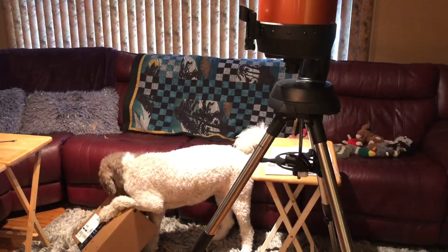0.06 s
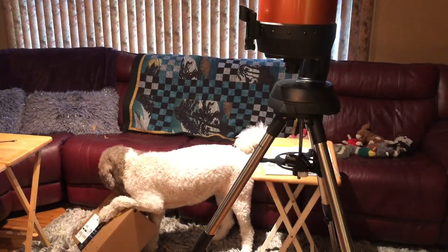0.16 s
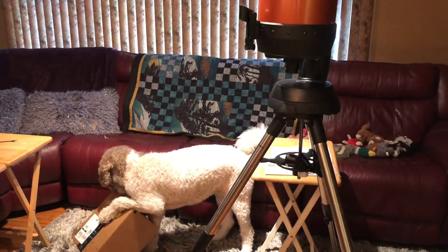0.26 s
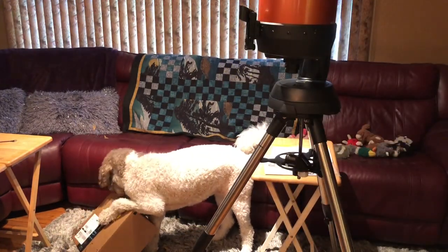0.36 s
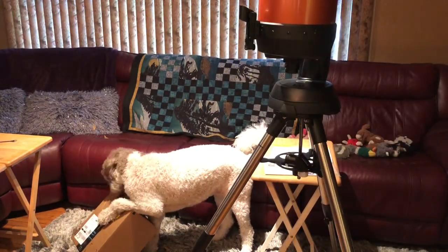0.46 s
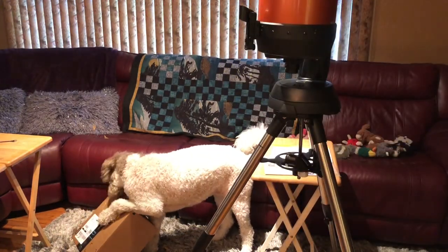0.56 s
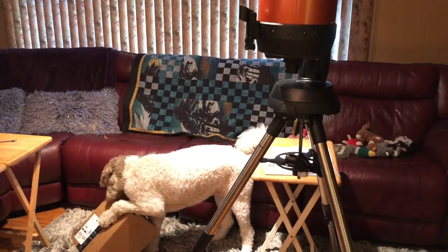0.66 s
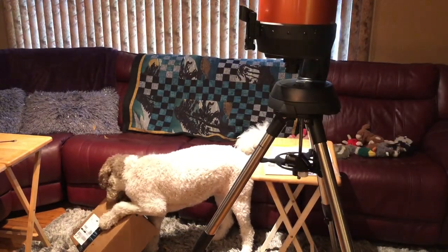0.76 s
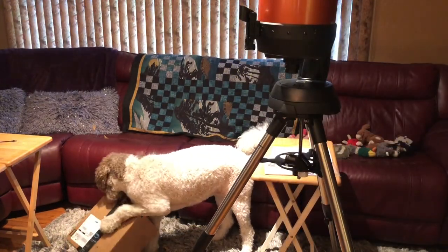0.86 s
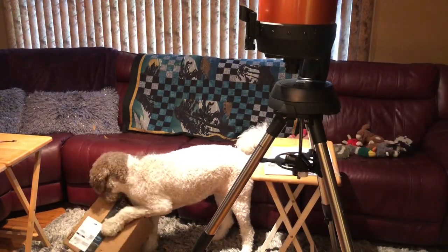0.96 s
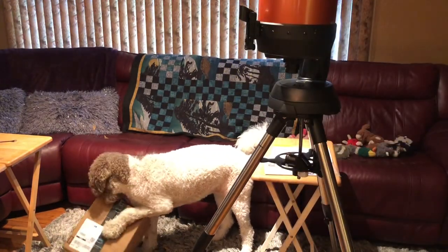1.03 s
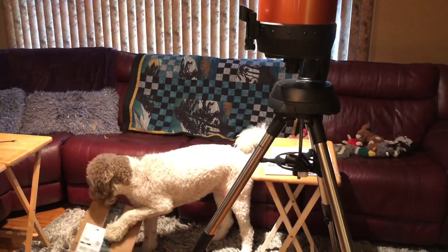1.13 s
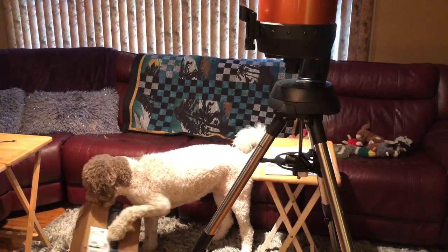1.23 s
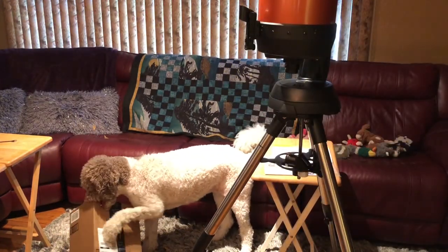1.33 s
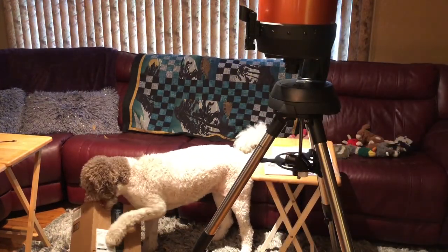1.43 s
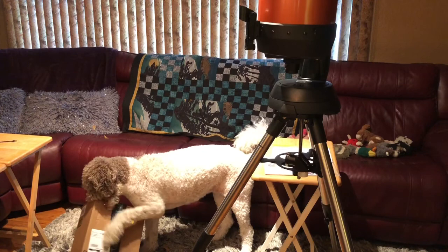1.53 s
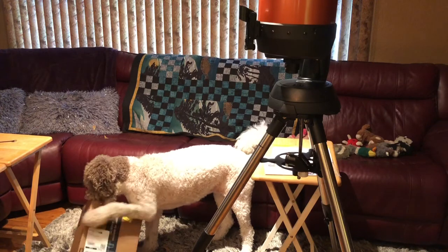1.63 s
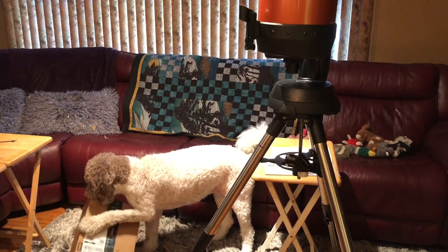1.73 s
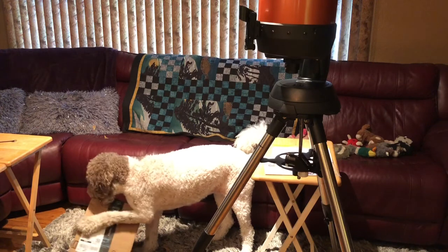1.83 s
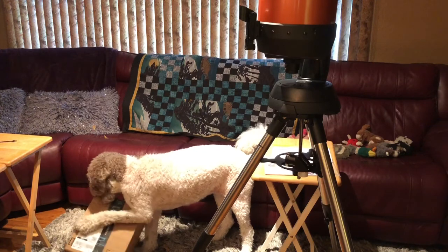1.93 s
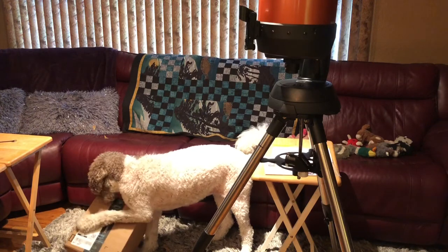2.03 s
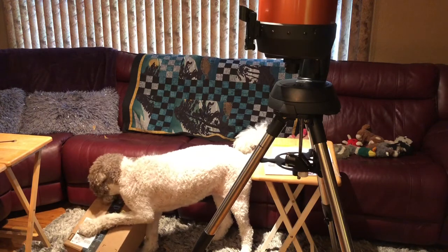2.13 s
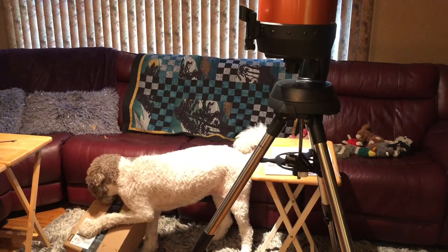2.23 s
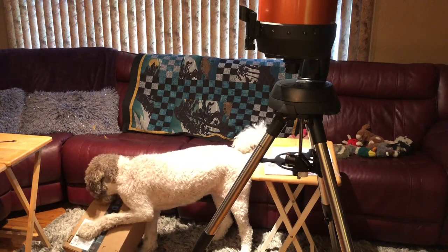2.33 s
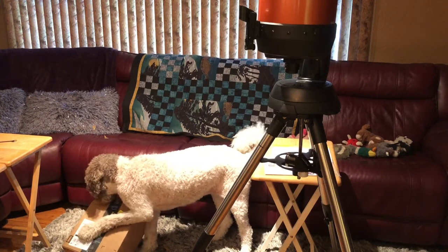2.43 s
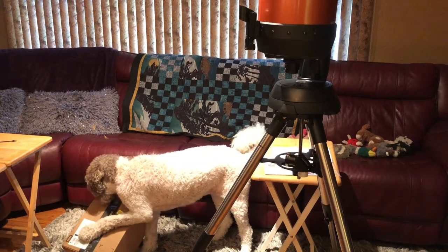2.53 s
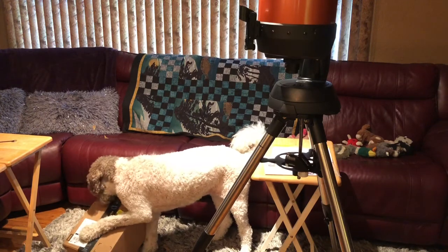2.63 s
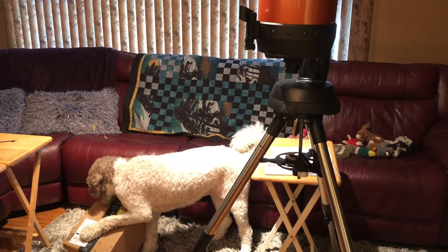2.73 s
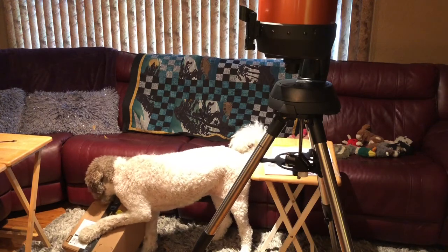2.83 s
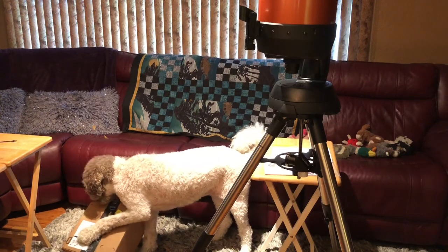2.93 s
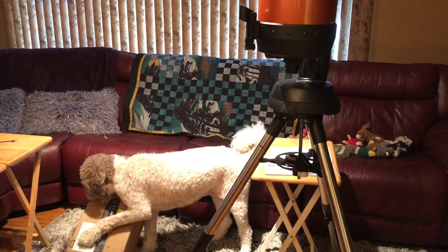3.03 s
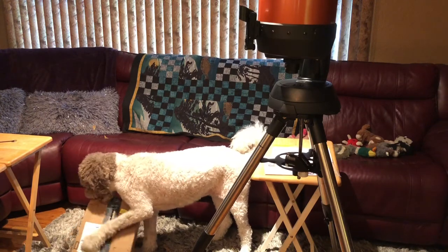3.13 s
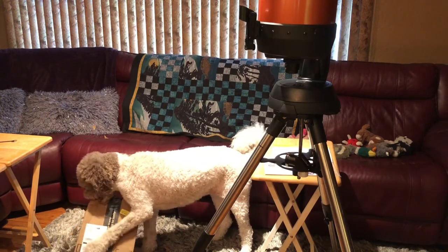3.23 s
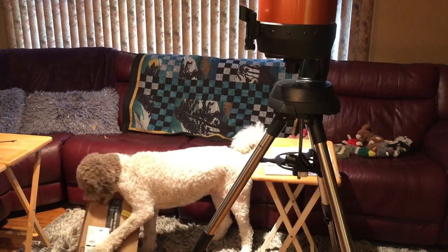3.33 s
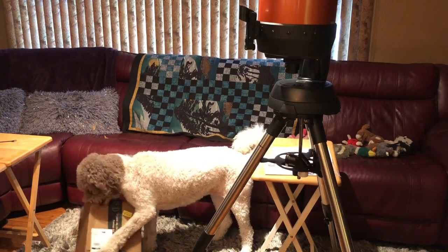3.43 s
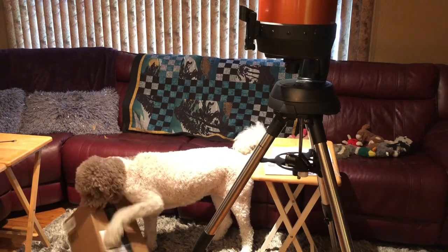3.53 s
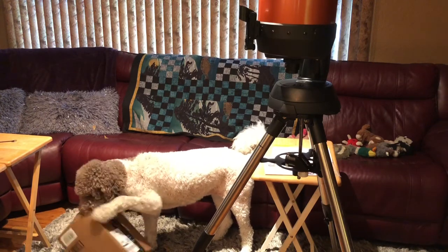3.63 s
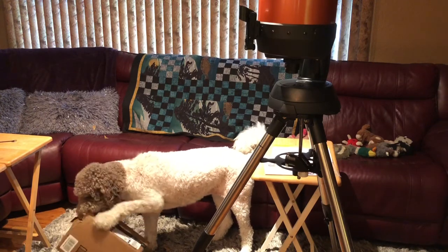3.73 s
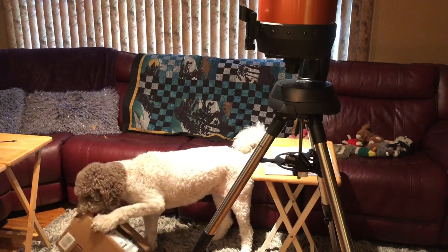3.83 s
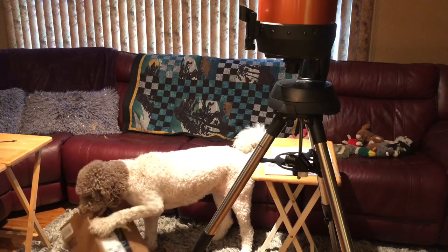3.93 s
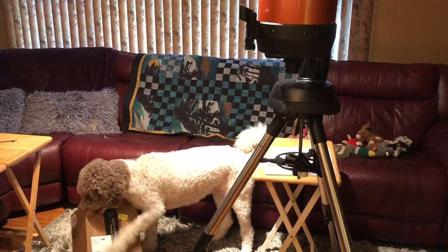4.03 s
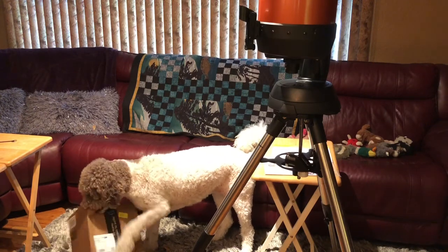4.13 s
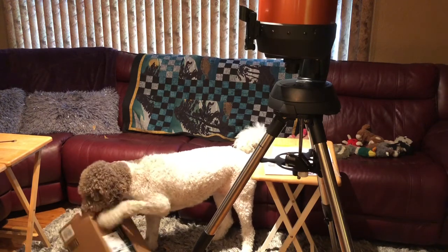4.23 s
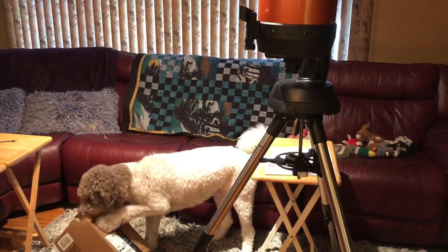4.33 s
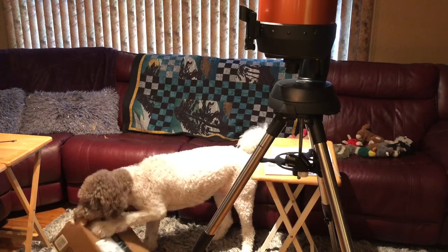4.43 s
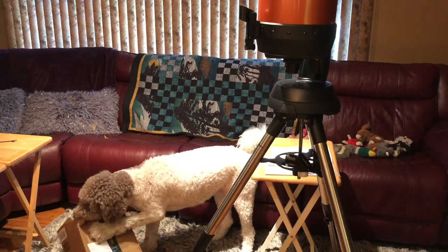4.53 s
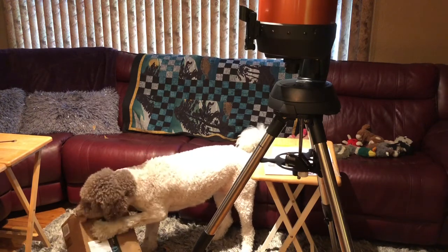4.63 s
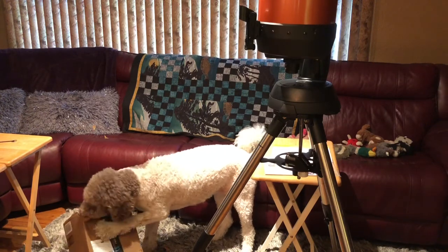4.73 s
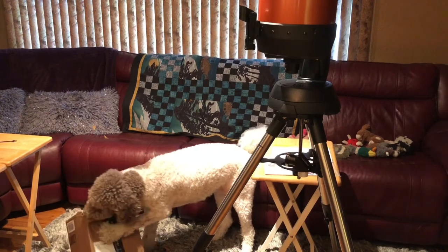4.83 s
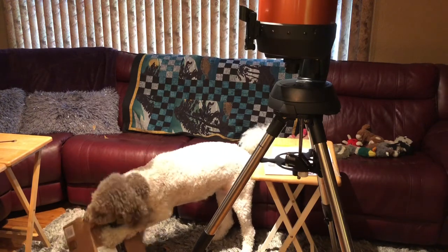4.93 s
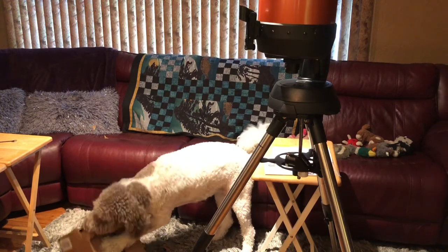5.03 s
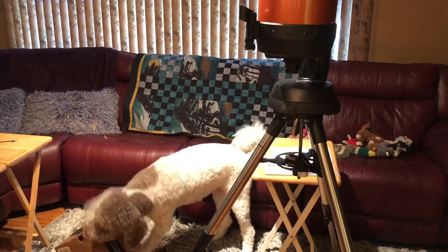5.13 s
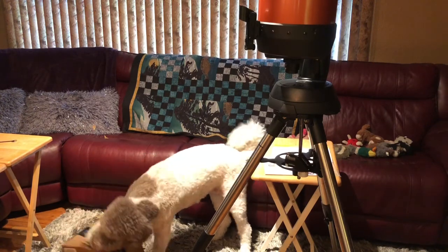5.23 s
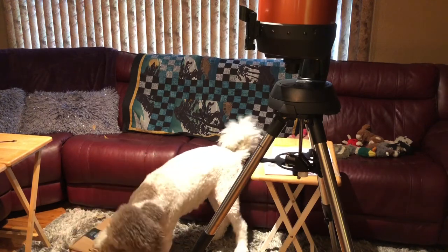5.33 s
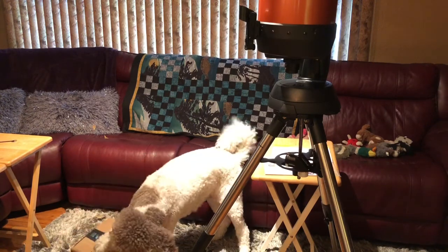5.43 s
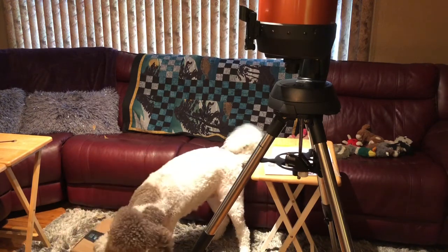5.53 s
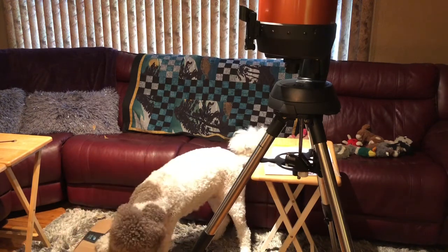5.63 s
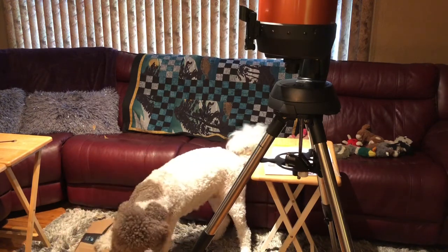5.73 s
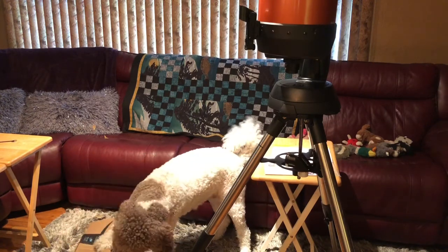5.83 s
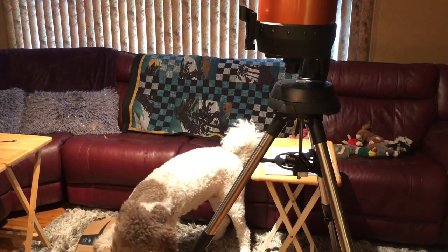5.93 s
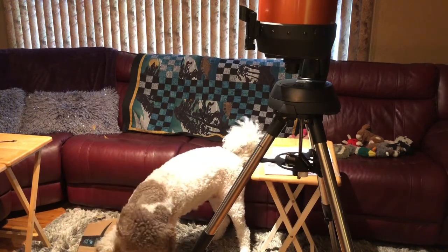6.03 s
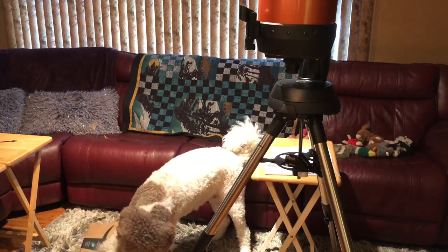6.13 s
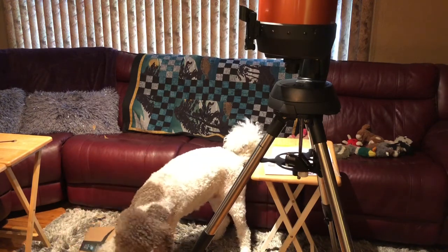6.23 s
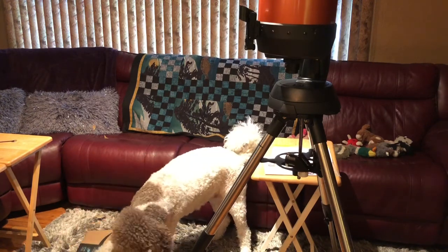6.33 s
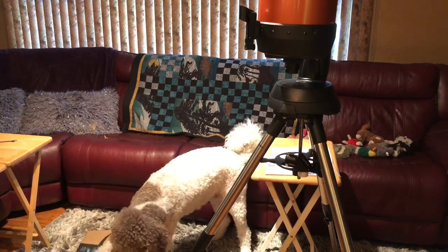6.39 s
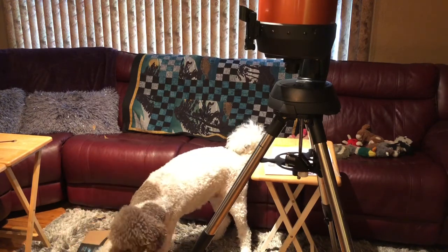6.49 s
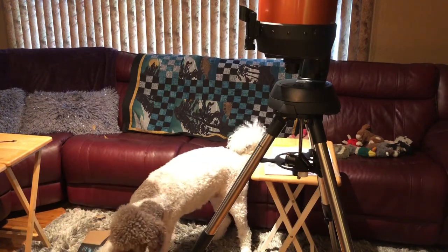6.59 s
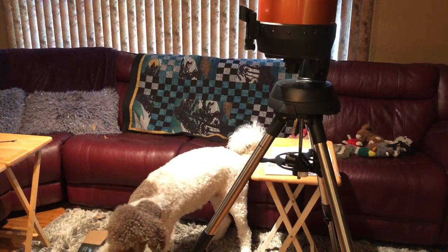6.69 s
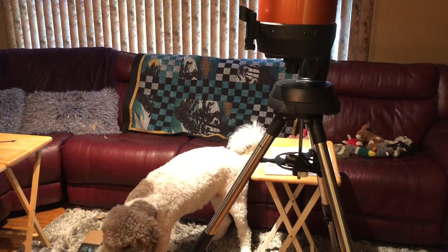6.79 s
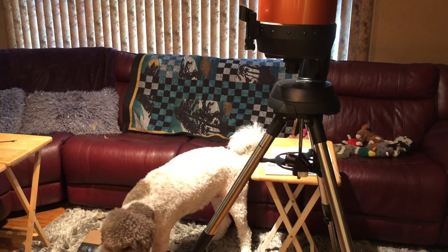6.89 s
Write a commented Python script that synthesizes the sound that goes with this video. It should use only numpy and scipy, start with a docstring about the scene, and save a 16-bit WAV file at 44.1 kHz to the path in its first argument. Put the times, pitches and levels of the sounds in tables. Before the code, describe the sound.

Irregular hollow cardboard thumps, sharp claw clicks and short gritty scrapes as a dog worries a small box on a living-room floor.

```python
"""Furnished living room: a dog paws, shoves and tugs a small cardboard box over a rug.
Knocks ring the modes of the box and the boards; claws tick and paws swipe its paper skin with noise bursts.
Slides drive the box modes with grit and add paper hiss; each touch gets a wall echo and a diffuse tail.
Below lie steady air noise and a faint two-tone hum."""
import sys
import numpy as np
from scipy import signal
from scipy.fft import rfft, irfft, next_fast_len
from scipy.io import wavfile
from scipy.ndimage import uniform_filter1d

SR = 44100
rng = np.random.default_rng(int(sys.argv[2]) if len(sys.argv) > 2 else 0)


def generate_wav(sig):
    """Save sig (samples, or channels by samples) to the path in sys.argv[1] as 16-bit PCM at SR."""
    pcm = np.round(np.clip(np.atleast_2d(sig).T, -1, 1) * 32767).astype(np.int16)
    wavfile.write(sys.argv[1], SR, pcm)


N = 306783

# modes of the boards below the box: centre_hz, width_hz, relative_db
BOARDS = [(48, 32, -24), (77.4, 22, 6)]
# modes of the box cavity: centre_hz, width_hz, relative_db
CAVITY = [(156.6, 29.6, -3), (230, 53, -1.5), (315, 43, 2), (350, 58, 0.5)]
# modes of the box panels: centre_hz, width_hz, relative_db
PANELS = [(492, 66, -2), (580, 36, -5), (658, 33, -2), (781, 80, -7)]
# modes of the box flaps: centre_hz, width_hz, relative_db
FLAPS = [(855, 50, -2), (970, 73, -3), (1080, 62, -4), (1177, 54, -4), (1296, 70, -3.5), (1446, 89, -3.5),
         (1637, 106, -3), (1836, 100, -2.5), (2036, 112, -2), (2170, 540, -23)]
# blows on the box: start_s, cavity_db, boards_db, panels_db, flaps_db, low_pitch_hz, high_pitch_hz,
# focus_db_per_octave (on high pitch), contact_s
KNOCKS = [(0.0, -37.5, -49, -37.5, -44, 157, 970, 7, .0077),
          (0.618, -37, -59, -49, -47, 238, 867, 19, 0.0042),
          (0.662, -35, -42.5, -40.5, -39.5, 244, 1200, 24, .006),
          (0.773, -37, -46, -40.5, -39, 315, 1190, 8, 0.0032),
          (0.877, -21, -36, -66, -30.5, 206, 1220, 7, 0.0029),
          (1.037, -18.5, -34, -30.5, -23, 269, 1010, 5, 0.0049),
          (1.278, -33.5, -44, -37, -38.5, 249, 859, -9, 0.0044),
          (1.384, -46, -65, -41.5, -38.5, 340, 1480, 15, 0.0066),
          (1.6503, -28.5, -44, -32, -31, 327, 905, 5.5, 0.0029),
          (2.012, -35.5, -48, -47, -48, 192, 1610, 9, 0.0038),
          (2.073, -35.5, -45, -34.5, -40, 350, 802, 0, 0.0012),
          (2.294, -28, -52, -40.5, -36, 204, 1320, 8, 0.0024),
          (2.428, -46, -59, -45.5, -40, 191, 910, -1, 0.0064),
          (2.696, -40, -40, -43, -62, 154, 810, 7, 0.0065),
          (2.751, -34, -47, -63, -43, 184, 1220, 11, 0.0034),
          (2.843, -30.5, -47, -39, -39, 300, 1400, 18, 0.0063),
          (2.864, -33, -43, -47, -47, 159, 824, 12, 0.0037),
          (3.128, -50, -63, -37.5, -58, 304, 853, 12, 0.013),
          (3.1805, -16.5, -30, -24, -19.5, 196, 870, 10, 0.0028),
          (3.507, -40.5, -62, -48, -65, 222, 824, 14, 0.027),
          (3.569, -43, -65, -39.5, -44, 258, 1080, 25, 0.01),
          (3.639, -40.5, -60, -42.5, -39.5, 242, 1390, 12, 0.0048),
          (3.717, -58, -68, -59, -43, 212, 1170, 5, 0.014),
          (3.931, -39, -64, -43, -46, 346, 1620, 26, 0.02),
          (3.972, -45, -46, -30, -18.5, 177, 1080, 16, 0.0028),
          (4.247, -32, -44, -33, -36, 355, 1120, 18, 0.006),
          (4.778, -64, -63, -39, -43, 164, 834, 13, 0.003),
          (4.962, -33.5, -64, -31.5, -30, 171, 1880, 12, 0.0026),
          (5.026, -37, -47, -31.5, -32, 172, 880, 0, 0.0058),
          (5.149, -17, -52, -19.5, -23.5, 210, 848, 8, 0.011),
          (5.173, -21.5, -28.5, -41, -25, 196, 1250, 28, 0.0026),
          (5.228, -35, -42, -31, -41, 259, 999, 17, 0.0044),
          (5.334, -39, -57, -34.5, -37, 210, 824, 15, .007),
          (5.61, -29.5, -42, -36, -39, 242, 1010, 3, 0.009),
          (5.63, -34, -48, -48, -37, 156, 1520, 0, 0.016),
          (5.975, -54, -72, -49, -46.5, 320, 1580, 9, .0049),
          (6.147, -41.5, -65, -55, -57, 298, 894, 12, .006),
          (6.309, -38, -51, -38.5, -58, 248, 810, 16, 0.0031),
          (6.421, -33, -65, -43, -38, 300, 906, 45, 0.012),
          (6.457, -33, -44, -65, -41, 262, 890, 30, 0.0057),
          (6.741, -41, -60, -62, -62, 270, 818, 3, 0.0079)]
KNOCK_ROOM_DB = 1.2  # room tail over direct blow


def knocks():
    """A blow rings each mode family at its own level; low and high pitches favour the nearest modes."""
    out = np.zeros(N + SR)
    t = np.arange(SR * 2 // 5) / SR
    for start_s, cavity_db, boards_db, panels_db, flaps_db, low_hz, high_hz, focus_db, contact_s in KNOCKS:
        cavity = focused(CAVITY, low_hz, db_per_octave=15.0)
        flaps = focused(FLAPS, high_hz, focus_db)
        colours = [softened(resonant(BOARDS), hz=109), softened(resonant(cavity), hz=520),
                   softened(resonant(PANELS), hz=920), softened(resonant(flaps), hz=2760)]
        levels_db = [boards_db, cavity_db, panels_db, flaps_db]
        force = contact(t, contact_s, first=1.48, rise=0.1)
        blow = heard(force, colours, levels_db, KNOCK_ROOM_DB, span_s=0.0039)
        out[round(start_s * SR):][:len(t)] += blow
    return out[:N]


# claw ticks: start_s, level_db, pitch_hz, top_treble_db, contact_s
TICKS = [(0.1895, -32.5, 4700, -44, 0.002), (0.3018, -43.5, 4000, -40.5, .0021),
         (0.7377, -33, 4730, -58, 0.0027), (0.8725, -22, 6900, -60, 0.005),
         (1.0362, -19, 2630, -37, 0.0026), (1.041, -18, 3770, -39, 0.001), (1.1767, -40, 2860, -55, .0037),
         (1.2756, -33, 2870, -49, .003), (1.3835, -38, 2850, -51, 0.0052), (1.651, -39, 4430, -44, 0.007),
         (2.0165, -43, 2810, -63, .0033), (2.073, -31, 2530, -27.5, 0.0022),
         (2.2882, -26, 4500, -32, 0.0087), (2.396, -34.5, 3800, -50, 0.0019),
         (2.6462, -38.5, 3460, -46, 0.0042), (2.7488, -32, 4840, -65, 0.0022),
         (2.8393, -31.5, 2920, -33, 0.011), (3.1775, -20.5, 2470, -46, .004),
         (3.9579, -21.5, 4160, -42, 0.0034), (3.9725, -19, 4030, -18.5, 0.005),
         (4.2482, -38, 2630, -60, 0.0045), (4.4249, -26, 4840, -30, 0.011), (4.8246, -39, 3180, -46, .0033),
         (4.963, -21.5, 4150, -29.5, 0.0017), (5.0236, -22.5, 3100, -59, 0.0027),
         (5.2314, -29, 2970, -65, 0.00081), (5.6096, -40, 3760, -57, .0038),
         (5.6294, -33, 2870, -42, 0.0053), (5.9747, -29.5, 2470, -40.5, 0.019),
         (6.514, -43, 5300, -59, 0.0042)]


def claw_ticks():
    """Claws snap on the paper: a jolt and a fast-rising rattle."""
    return touches(TICKS, first=0.47, rise=0.021, spread=1.44, wet_db=-2.0, span_s=0.00078)


# short paw swipes over the paper: start_s, level_db, pitch_hz, top_treble_db, stroke_s
SWIPES = [(0.652, -32.5, 4360, -50, 0.016), (0.8502, -46, 7800, -58, .023),
          (1.0244, -32.5, 5000, -36, 0.0091), (1.329, -40.5, 2300, -42, .012),
          (1.8765, -47.5, 4370, -50, .0093), (2.42, -35, 2650, -50, 0.013), (3.1633, -32, 2650, -46, .018),
          (3.299, -44, 5400, -40, 0.035), (3.5673, -37, 4400, -37.5, 0.025), (3.712, -40, 4800, -43, .028),
          (3.9295, -39.5, 4030, -41, 0.016), (4.3077, -38.5, 2700, -69, 0.012),
          (4.769, -39, 5660, -50, 0.0057), (5.0447, -25.5, 2880, -47, 0.031),
          (5.1376, -24.5, 3660, -66, 0.025), (6.8663, -40.5, 4030, -48, 0.015)]


def paw_swipes():
    """Paws brush the paper: almost no jolt, a slower rattle."""
    return touches(SWIPES, first=0.05, rise=0.16, spread=1.8, wet_db=0.0, span_s=0.0014)


def touches(table, first, rise, spread, wet_db, span_s):
    """Noise bursts on the paper skin, each around its own pitch, plus a top-treble band."""
    out = np.zeros(N + SR)
    t = np.arange(SR // 4) / SR
    for start_s, level_db, pitch_hz, top_db, contact_s in table:
        colours = [paper(pitch_hz, spread, count=6), resonant([(12400, 13600, 0)])]
        force = contact(t, contact_s, first, rise)
        out[round(start_s * SR):][:len(t)] += heard(force, colours, [level_db, top_db], wet_db, span_s)
    return out[:N]


def paper(hz, spread, count):
    """Paper skin: broad around hz, with a few patches that ring at chance pitches."""
    broad = resonant([(hz, spread * hz, 0)])
    patch_hz = hz * np.exp(rng.normal(0, 0.5, count))
    patches = resonant([(c, 150, -.5) for c in patch_hz])
    return lambda f: broad(f) ** 2 * (1 + patches(f))


# spectrum of rubbed paper: freq_hz, relative_db
SKIN = [(1290, -43), (2200, 0), (3440, -1), (3720, 0), (4410, -0.5), (4770, -0.5), (8500, -8),
        (11000, -20.5), (18700, -120)]
# spectrum of the fine fibre hiss: freq_hz, relative_db
FIBRES = [(4410, -52), (7500, 1.5), (10400, 8), (11600, 13.5), (15200, 7.5), (16000, 19)]
# centres of the fixed rasp colours: pitch_hz
RASP_STOPS_HZ = [700, 1150, 1800]
# paws shifting on the rug between slides: level_db of drone, each rasp colour, surface hiss, fine hiss
REST_DB = [-65, -73, -69, -70]
# slides of the box over the rug: start_s, rise_s, hold_s, body_drone_db, panel_rasp_db, surface_hiss_db,
# fine_hiss_db, flap_pitch_hz
SLIDES = [(0.0, 0.003, 0.016, -45, -52, -61, -63, 800), (0.023, 0.041, 0.076, -65, -51, -56, -61, 980),
          (0.188, 0.093, 0.12, -53.5, -56.5, -61.5, -64, 850),
          (0.557, 0.069, 0.35, -50, -49.5, -53.5, -57, 940),
          (0.855, 0.022, 0.072, -42.5, -44, -47, -59, 1020),
          (1.04, 0.051, 0.11, -44, -45.5, -51, -53, 1180), (1.255, 0.025, .04, -42.5, -46, -51, -55, 970),
          (1.385, .03, 0.099, -52, -55.5, -63, -63, 800), (1.66, 0.017, 0.031, -41, -41, -53, -49.5, 1000),
          (1.8, 0.041, 0.18, -52.5, -58, -66, -73, 920),
          (2.039, 0.037, 0.05, -44.5, -43.5, -49, -47.5, 770),
          (2.267, 0.039, 0.03, -51, -50, -45, -49, 1120),
          (2.444, 0.044, 0.18, -55.5, -60.5, -61.5, -67, 890),
          (2.643, 0.041, 0.21, -55, -56.5, -57, -64, 900),
          (2.808, 0.032, 0.31, -52, -55.5, -53.5, -53, 1030),
          (3.175, 0.014, 0.012, -30, -36.5, -43, -39.5, 945),
          (3.284, 0.03, 0.071, -53.5, -51.5, -55.5, -57, 930),
          (3.46, 0.15, 0.048, -59, -48.5, -55, -55, 1050),
          (3.695, 0.029, 0.026, -51.5, -44, -51.5, -59, 1240),
          (3.835, .05, .06, -59, -56, -63.5, -62, 1100), (3.959, 0.018, 0.026, -34, -31, -38.5, -54, 950),
          (4.083, 0.026, 0.23, -57.5, -48.5, -55.5, -57.5, 940),
          (4.414, 0.048, 0.065, -44, -41, -50, -54, 910), (4.666, 0.061, 0.12, -53, -50.5, -53, -53, 830),
          (5.014, 0.038, 0.077, -35, -33.5, -46, -46, 1040),
          (5.135, 0.025, 0.12, -56, -43, -48, -47.5, 850), (5.32, 0.03, 0.28, -53, -53.5, -57.5, -59, 900),
          (5.593, .06, 0.07, -46, -50.5, -53, -55, 1100), (5.736, 0.043, 0.11, -55.5, -60, -61, -61, 950),
          (5.948, 0.057, 0.11, -57, -52.5, -54.5, -58, 1260),
          (6.102, 0.13, 0.066, -58.5, -55.5, -50, -53, 780),
          (6.42, 0.033, .08, -45.5, -53, -58.5, -64, 910), (6.709, 0.14, 0.067, -49.5, -56, -59, -62, 900)]


def rubbing():
    """Grit under the sliding box drives its modes; paws and rug hiss on the paper."""
    drone_db, rasp_db, hiss_db, fine_db, pitch_hz = np.transpose(SLIDES)[3:]
    power = strokes()

    def gain(db, rest_db, share=1):
        """Slide and rest powers summed, as an amplitude per sample."""
        level = np.sqrt((share * amp(db)) ** 2 @ power + amp(2 * rest_db))
        return np.interp(np.arange(N) / 64, np.arange(power.shape[1]), level)

    coarse = grit(per_second=900, spread_db=2.0, smooth=1.0)
    fine = grit(per_second=2700, spread_db=5.0, smooth=2.2)

    # each slide mixes the fixed colours next to its pitch
    place = np.interp(pitch_hz, RASP_STOPS_HZ, np.arange(len(RASP_STOPS_HZ)))
    rasp = np.zeros(N)
    for k, hz in enumerate(RASP_STOPS_HZ):
        share = np.clip(1 - abs(place - k), 0, 1)
        colour = resonant(focused(PANELS[2:] + FLAPS, hz, db_per_octave=13.6))
        rasp += gain(rasp_db, REST_DB[1], share) * unit(filtered(coarse, colour))

    drone = filtered(coarse, softened(resonant(CAVITY + PANELS[:2]), hz=830))
    hiss = patchy(filtered(fine, coloured(SKIN)), depth_db=1.5)
    fine_hiss = patchy(filtered(fine, coloured(FIBRES)), depth_db=1.5)
    return (patchy(rasp, depth_db=2.0) + gain(drone_db, REST_DB[0]) * unit(drone)
            + gain(hiss_db, REST_DB[2]) * unit(hiss) + gain(fine_db, REST_DB[3]) * unit(fine_hiss))


SET_OFF_DB_PER_S = 350  # extra slope before the start: quick break from rest
RISE_DB = 6  # start level under peak
SETTLE_DB_PER_S = 121.5  # decay as the box comes to rest


def strokes():
    """Power of each slide, peak 1, every 64 samples: it swells, holds and settles."""
    start_s, rise_s, hold_s = np.transpose(SLIDES)[:3, :, None]
    t = np.arange(0, N + 64, 64) / SR - start_s
    db = -SET_OFF_DB_PER_S * np.clip(-t, 0, None)
    db = db - RISE_DB * np.clip(1 - t / rise_s, 0, None)
    db = db - SETTLE_DB_PER_S * np.clip(t - rise_s - hold_s, 0, None)
    return amp(2 * db)


def grit(per_second, spread_db, smooth):
    """Catches of a rough surface: random clicks of uneven but bounded size on a share of even hiss."""
    size_db = spread_db * np.minimum(rng.exponential(size=N), 3)
    caught = rng.random(N) < per_second / SR
    clicks = caught * rng.standard_normal(N) * amp(size_db)
    return unit(clicks) + smooth * rng.standard_normal(N)


def patchy(x, depth_db):
    """x with random louder and softer patches in time and frequency."""
    z = signal.stft(x, nperseg=256)[2]
    field = uniform_filter1d(rng.standard_normal(z.shape), size=3, axis=0)
    field = uniform_filter1d(field, size=16, axis=1)
    return signal.istft(z * amp(depth_db * unit(field)), nperseg=256)[1][:N]


def contact(t, seconds, first, rise):
    """Force of a touch: a first jolt, then a rattle that swells for a share of the contact and dies."""
    swell = 1 - np.exp(-t / (rise * seconds))
    rattle = rng.standard_normal(len(t)) * np.exp(-t / seconds) * swell
    return first * (t == 0) + rattle / np.linalg.norm(rattle)


WALL_S, WALL_DB = .005, -8.5  # nearest wall returns each touch once


def heard(force, colours, levels_db, wet_db, span_s):
    """Each colour direct with its wall echo, plus room tail; level = path energy spread over span_s."""
    direct = force + amp(WALL_DB) * np.roll(force, round(WALL_S * SR))
    paths = np.array([direct, room_tail(len(force))])
    parts = np.array([filtered(paths, c) for c in colours])  # colour, path, sample
    parts = parts / np.linalg.norm(parts, axis=2, keepdims=True)
    return np.sqrt(span_s * SR) * amp(levels_db) @ (parts[:, 0] + amp(wet_db) * parts[:, 1])


# decay of the room: freq_hz, t60_s
ROOM = [(70, 0.24), (250, 0.32), (1000, 0.4), (4000, 0.31), (12000, 0.44)]


def room_tail(n):
    """A fresh diffuse tail in which each frequency dies at its own speed."""
    hz, t, z = signal.stft(rng.standard_normal(n), SR, nperseg=256)
    decay = amp(-60 * t / along(ROOM, hz)[:, None])
    tail = signal.istft(z * decay, SR, nperseg=256)[1]
    return np.pad(tail, (round(.005 * SR), 0))[:n]  # starts with the first walls


# spectrum of the quiet room: freq_hz, relative_db
AIR = [(18, -52), (30, 4), (61, -2.5), (106, 6.5), (170, -8.5), (632, -13), (702, -1), (1010, -10),
       (1100, -17), (2290, -22), (16000, -65)]
AIR_DB = -59.5  # rms before the final filter
# hum tones: freq_hz, rms_db before the final filter
HUM = [(92, -83), (120, -71)]


def room_tone():
    """Steady shaped air noise and faint hum sines."""
    t = np.arange(N) / SR
    hum = sum(amp(db) * np.sqrt(2) * np.sin(2 * np.pi * hz * t) for hz, db in HUM)
    return amp(AIR_DB) * unit(filtered(rng.standard_normal(N), coloured(AIR))) + hum


def amp(db):
    """Amplitude ratio of a level in dB."""
    return 10 ** (np.asarray(db) / 20)


def unit(x):
    """x at rms 1."""
    return x / np.sqrt(np.mean(x ** 2) + 1e-20)


def along(points, hz):
    """(Hz, value) points interpolated on a log frequency axis."""
    f, v = np.transpose(points)
    return np.interp(np.log(hz + 1), np.log(f + 1), v)


def filtered(x, response):
    """x times a complex response of frequency, zero-padded."""
    m = next_fast_len(x.shape[-1] + 8192)
    return irfft(rfft(x, m) * response(np.fft.rfftfreq(m, 1 / SR)), m)[..., :x.shape[-1]]


def resonant(modes):
    """Causal response of (Hz, width Hz, dB) modes, summed with alternating signs."""
    return lambda f: sum((-1) ** k * amp(db) * 1j * f * w / (c * c - f * f + 1j * f * w)
                         for k, (c, w, db) in enumerate(modes))


def focused(modes, hz, db_per_octave):
    """Modes weighted by their distance in octaves from a favoured pitch."""
    return [(c, w, db - db_per_octave * abs(np.log2(c / hz))) for c, w, db in modes]


def softened(response, hz):
    """Two-pole treble loss above hz, as under a padded paw."""
    return lambda f: response(f) / (1 + 1j * f / hz) ** 2


def coloured(points):
    """Gain of a (Hz, dB) spectrum."""
    return lambda f: amp(along(points, f))


def scene():
    """All sources summed to one channel."""
    return (knocks() + claw_ticks() + paw_swipes() + rubbing() + room_tone())[None]


TOP_HZ = 15850


def record(dry):
    """Microphone band: steep bass cut around 44 Hz, nothing from TOP_HZ up."""
    return filtered(dry, lambda hz: (hz < TOP_HZ) * hz ** 6 / (hz ** 6 + 44 ** 6))


dry = scene()
out = record(dry)
generate_wav(out)
```